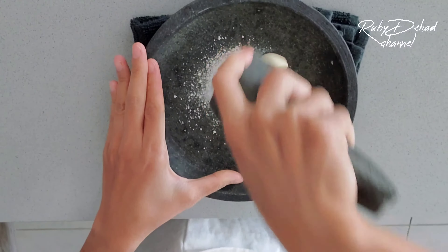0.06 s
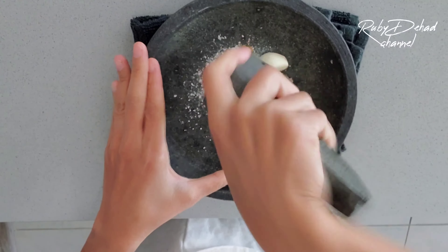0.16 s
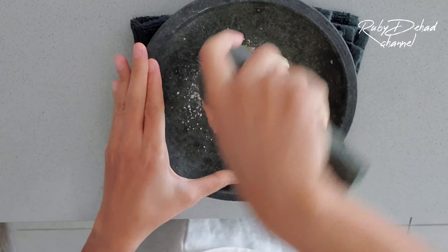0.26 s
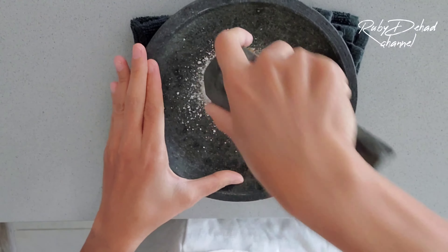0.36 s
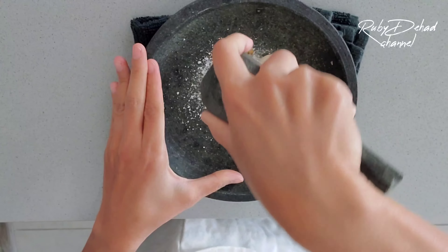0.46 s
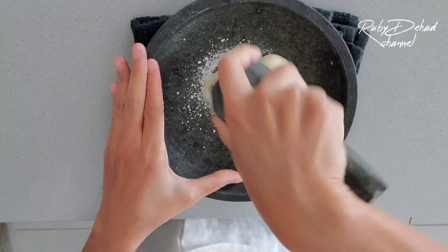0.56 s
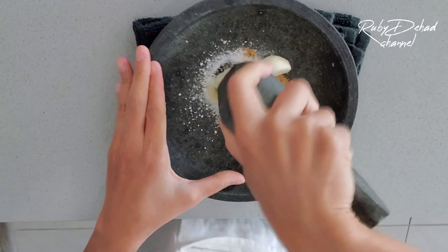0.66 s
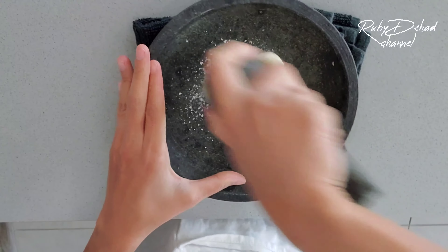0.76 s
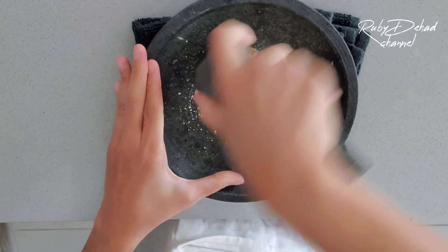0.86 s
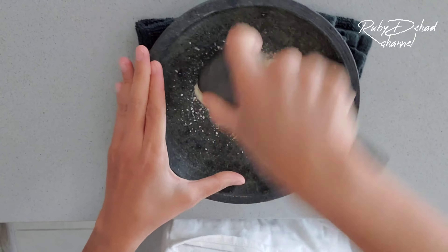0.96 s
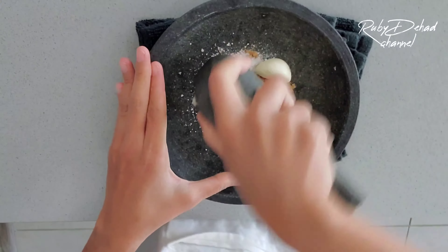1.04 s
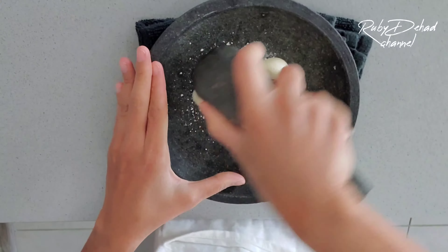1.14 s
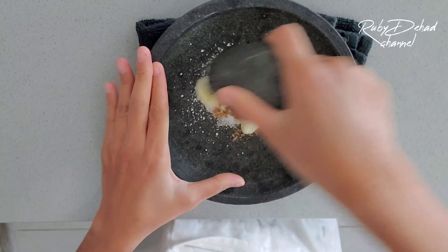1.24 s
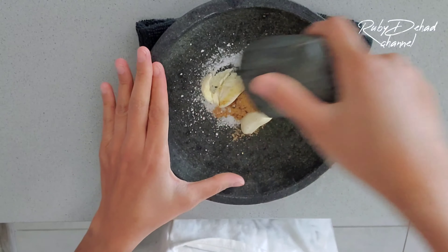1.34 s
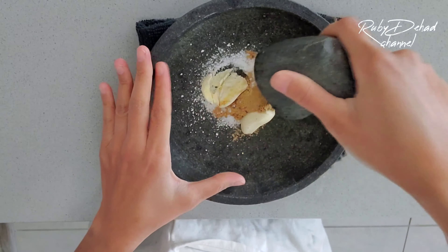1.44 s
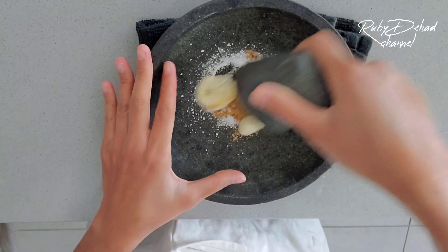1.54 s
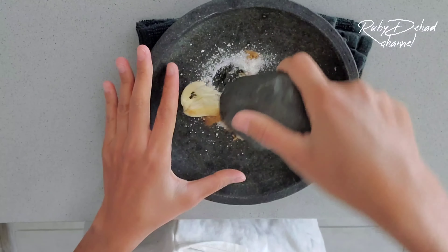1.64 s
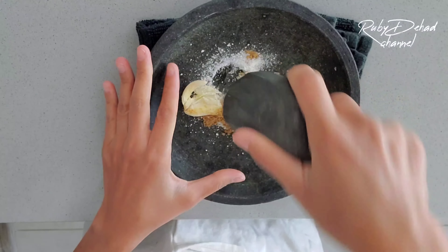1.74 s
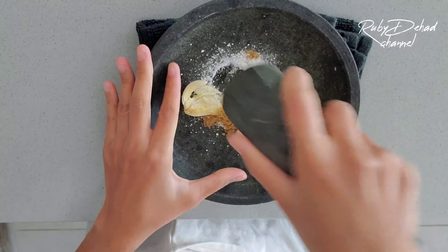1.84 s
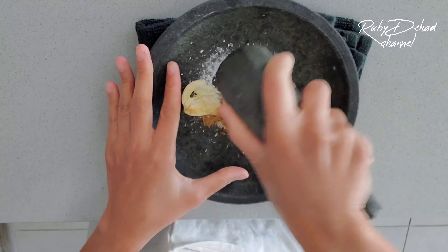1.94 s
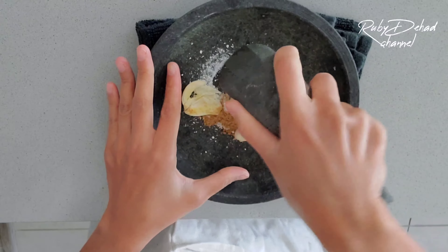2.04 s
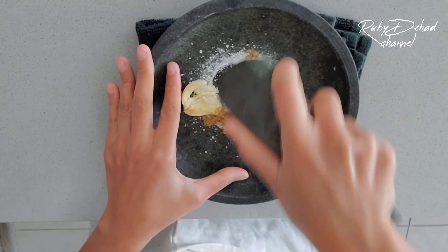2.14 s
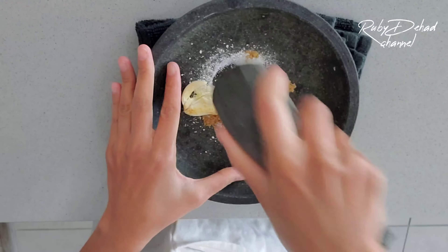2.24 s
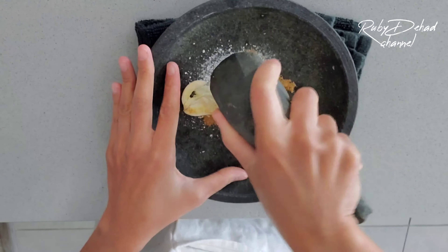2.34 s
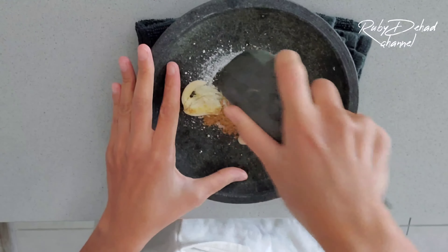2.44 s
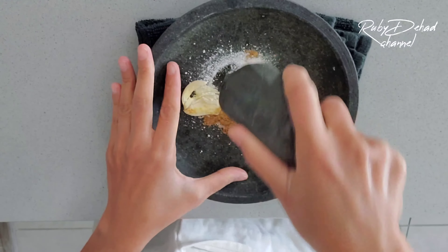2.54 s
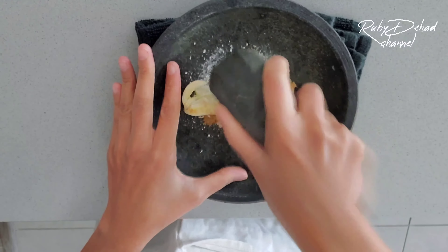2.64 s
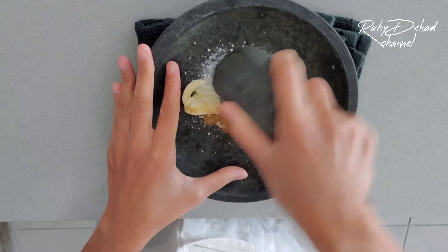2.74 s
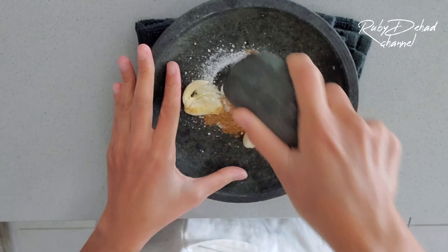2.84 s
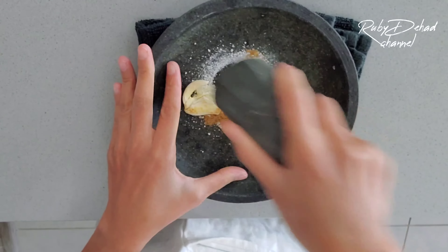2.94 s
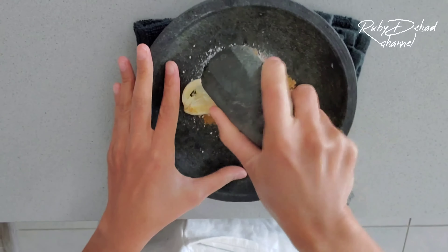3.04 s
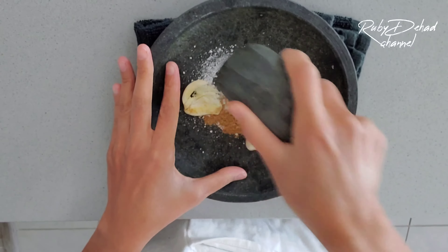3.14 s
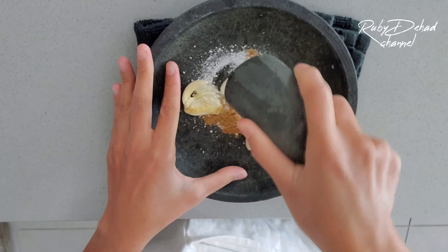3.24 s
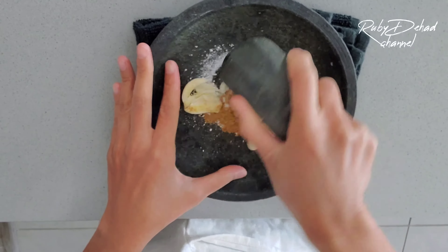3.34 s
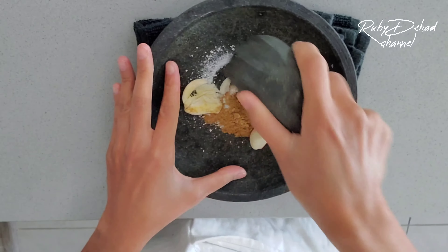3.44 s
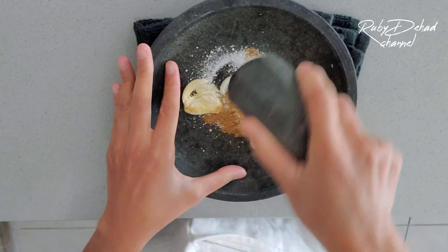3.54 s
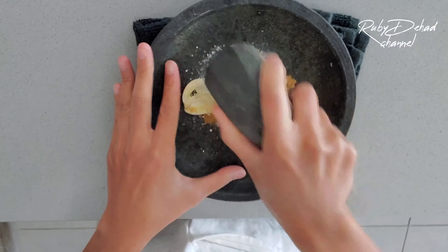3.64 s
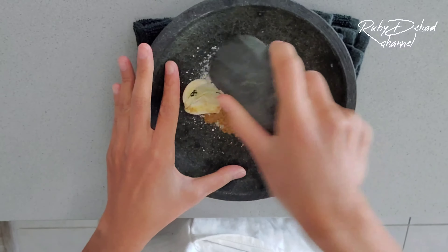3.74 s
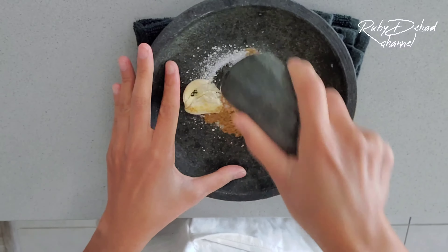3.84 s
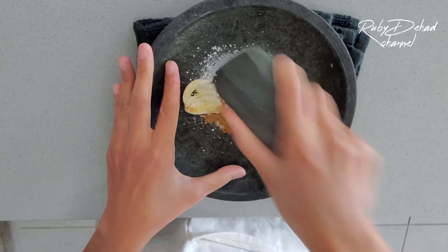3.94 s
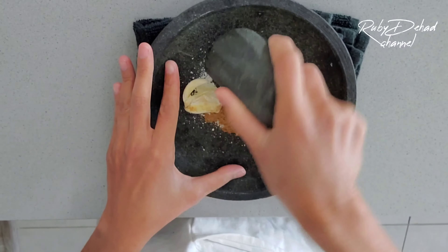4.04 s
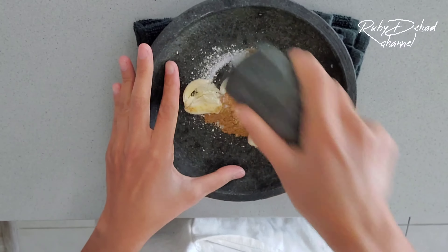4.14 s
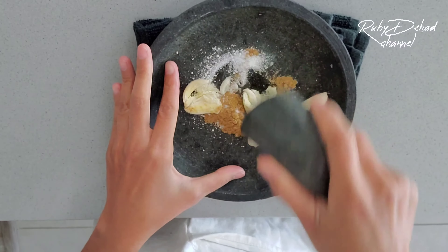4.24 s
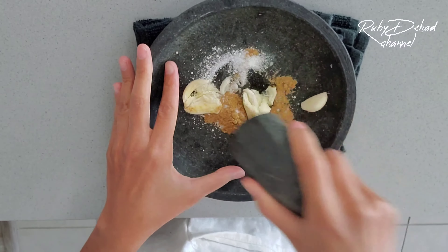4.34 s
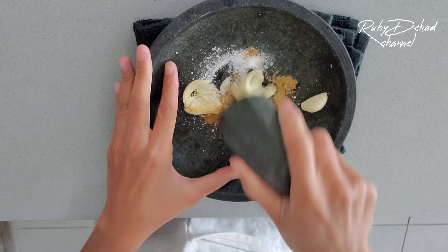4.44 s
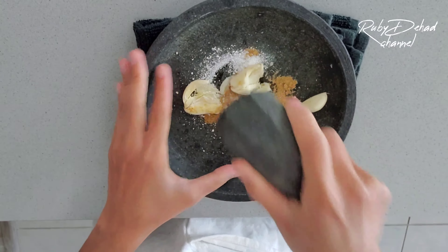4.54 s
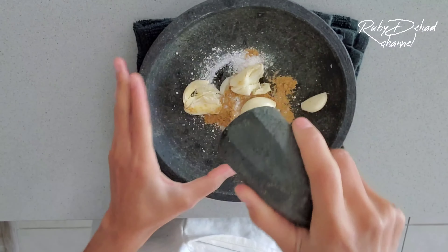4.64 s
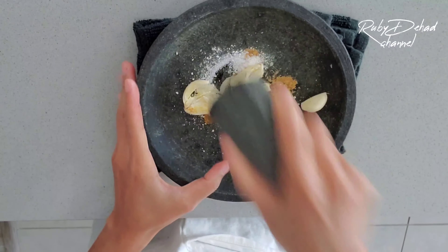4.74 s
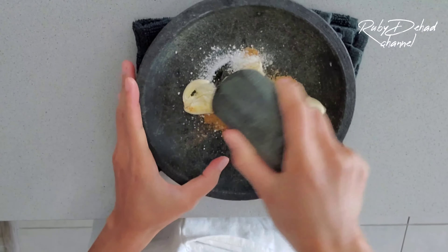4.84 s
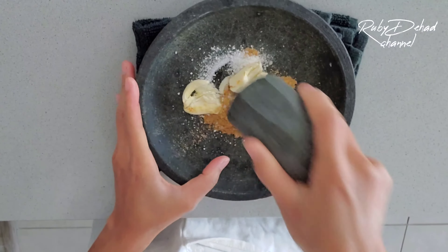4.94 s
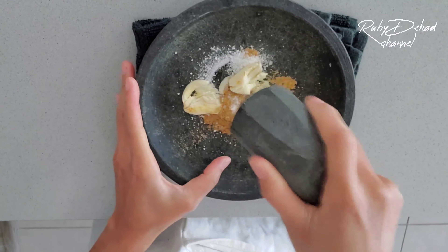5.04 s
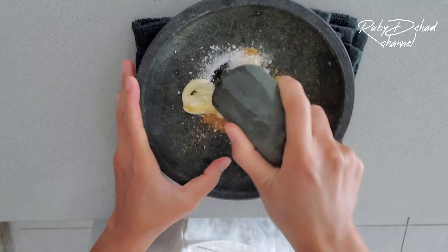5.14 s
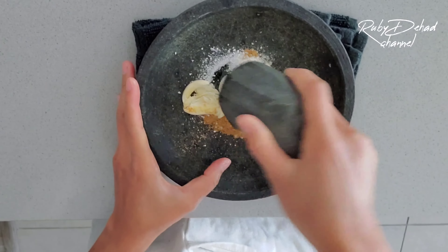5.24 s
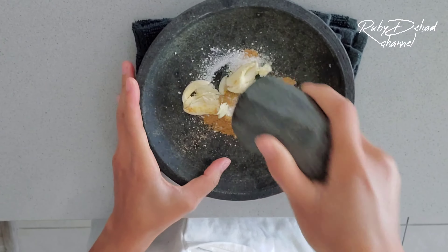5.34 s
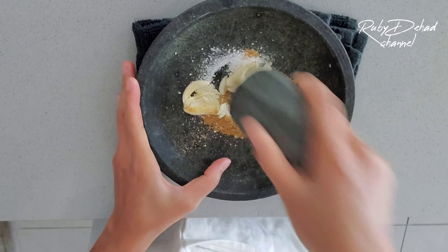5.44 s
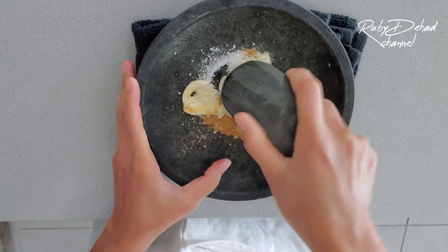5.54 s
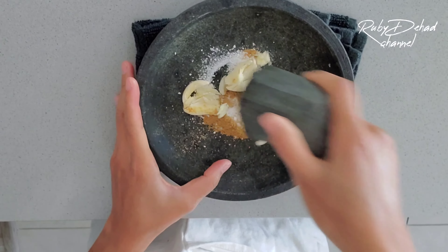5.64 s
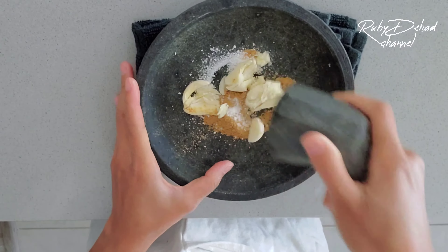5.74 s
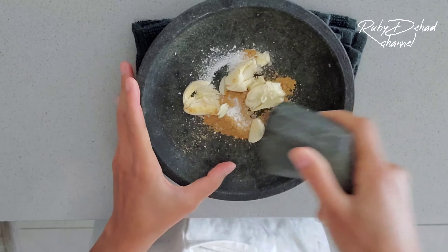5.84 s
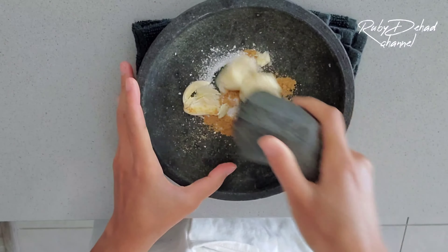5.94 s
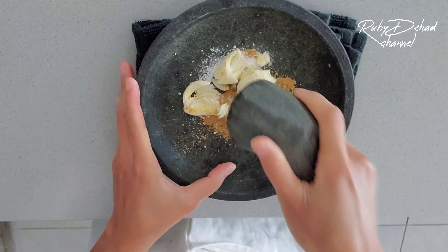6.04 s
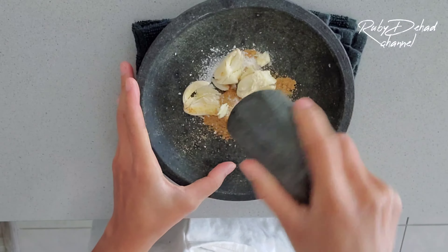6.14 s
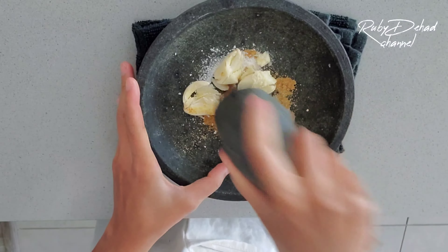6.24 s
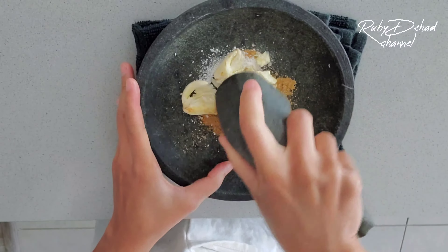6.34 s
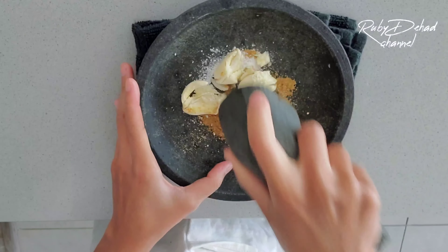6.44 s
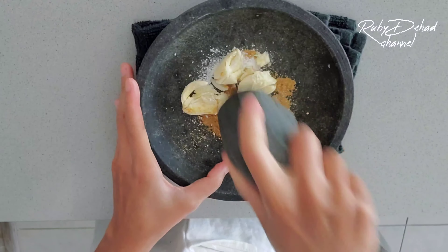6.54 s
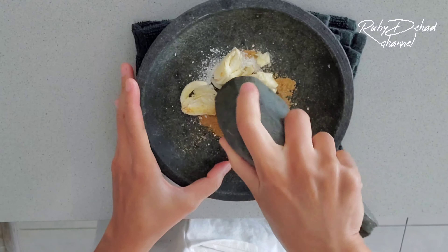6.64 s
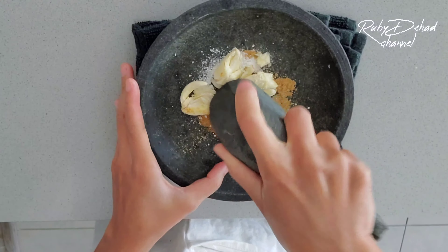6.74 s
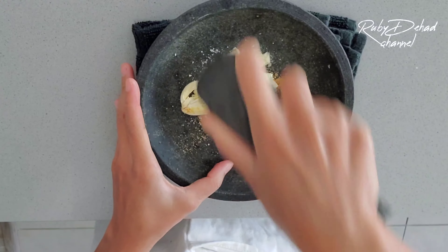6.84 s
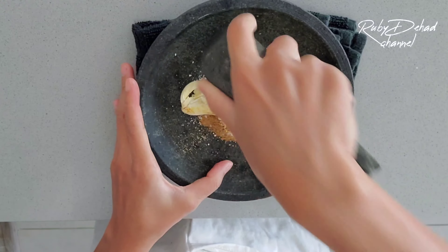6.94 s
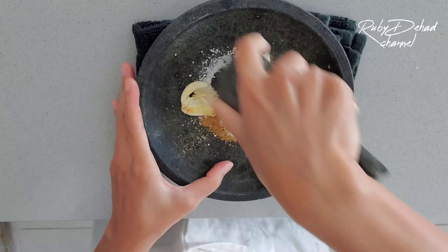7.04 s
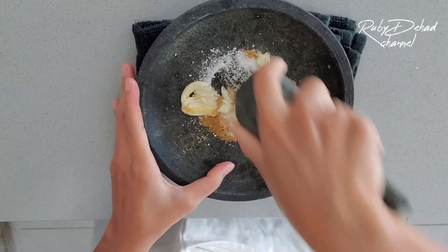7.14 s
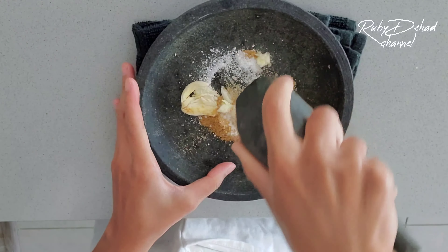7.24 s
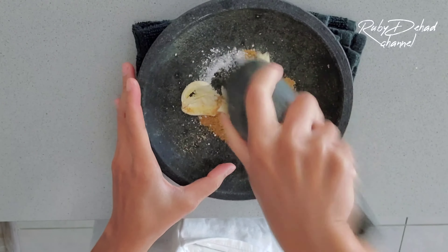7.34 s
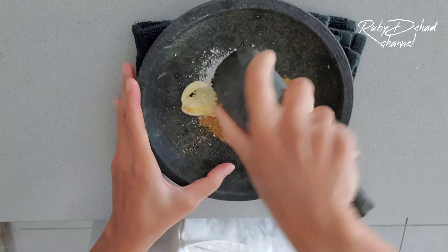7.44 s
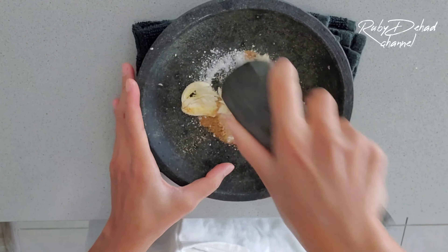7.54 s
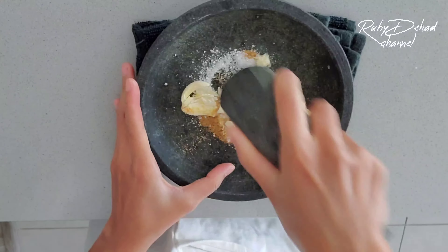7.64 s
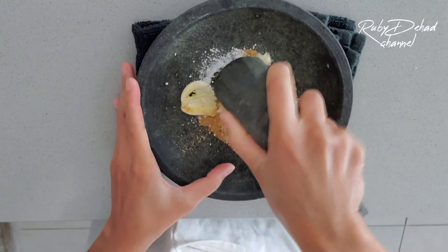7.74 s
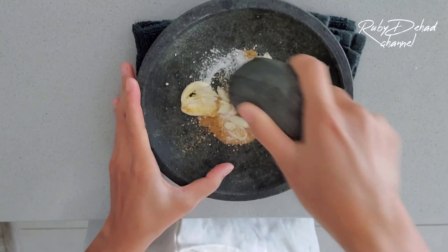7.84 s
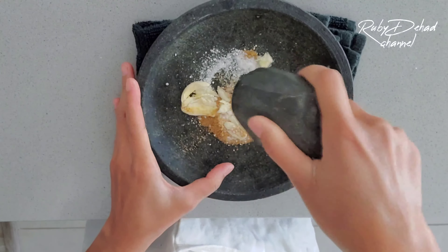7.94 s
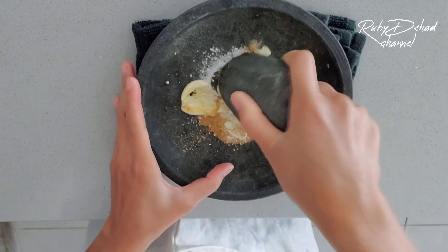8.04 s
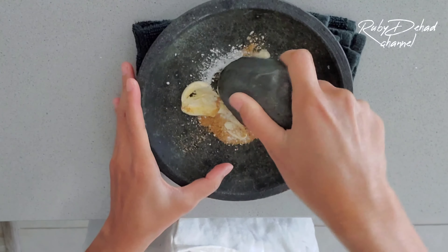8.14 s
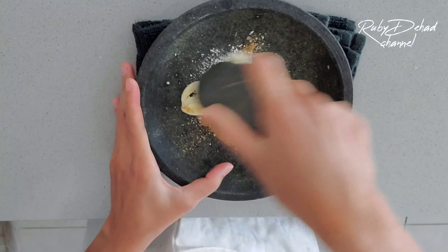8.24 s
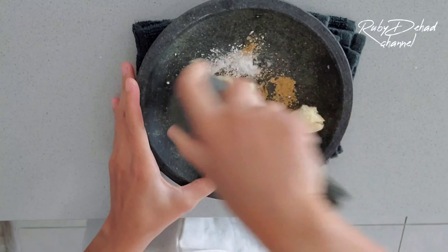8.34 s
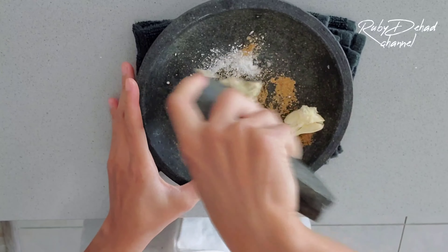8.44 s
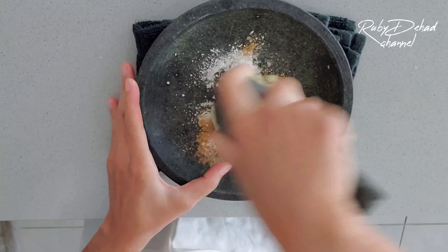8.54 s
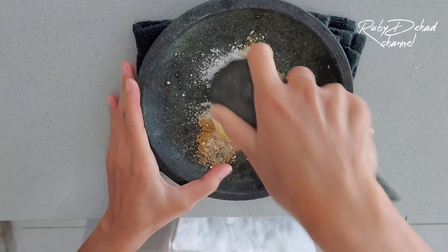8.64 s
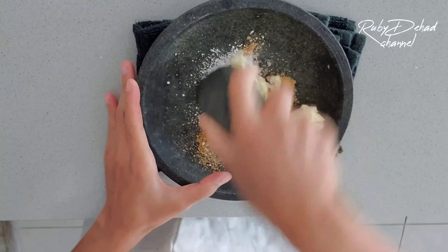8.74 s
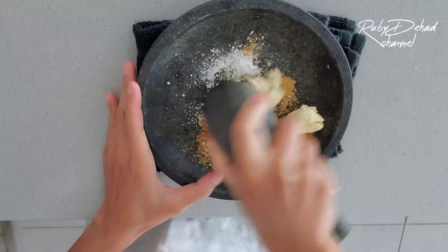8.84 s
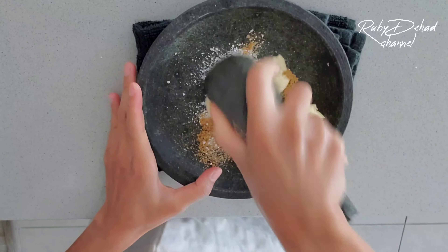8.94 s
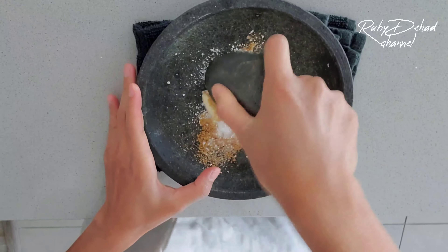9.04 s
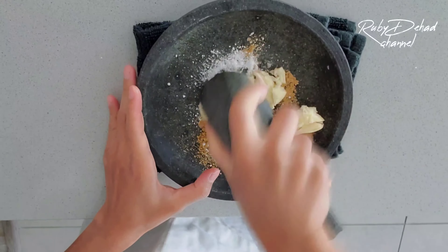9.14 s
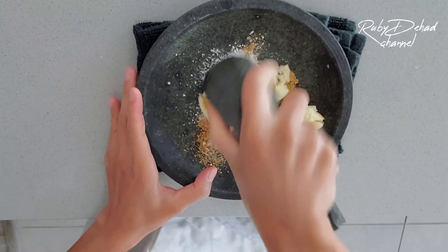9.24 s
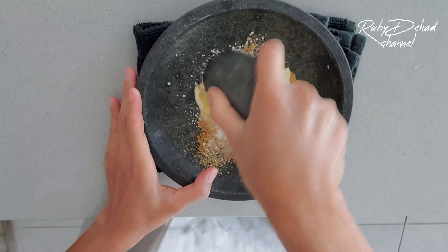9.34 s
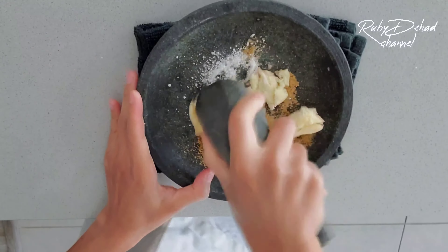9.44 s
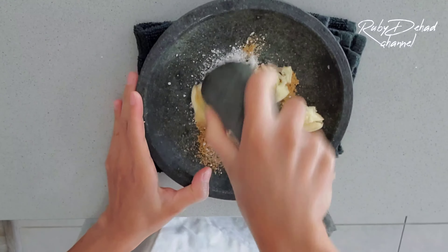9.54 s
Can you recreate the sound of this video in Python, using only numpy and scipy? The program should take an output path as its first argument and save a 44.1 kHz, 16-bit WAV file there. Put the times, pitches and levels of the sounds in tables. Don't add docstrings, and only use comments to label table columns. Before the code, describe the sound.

A stone mortar and pestle is heard from close above on a kitchen counter. At 0.1 seconds a crunchy blow lands with a low thump, then a softer one at 0.55. Until about 1.6 seconds, light gritty drags, clacks, a small squeak and snapping salt crystals fill in. From 1.9 to 3.9 seconds, firm blows fall roughly every third of a second, some doubled by a quick rebound: a bright sandy crack, short dry pestle ring, hollow bowl knock and deep, soft counter thump. A small scrape at 4.3 precedes more blows at 4.7 to 5.4, a pause with a faint squeak near 5.9, then pounding from 6.2 to 8.0, with one weak touch near 6.9. From 8.3 to 9.6 quieter grinding strokes crunch and rub, with clacks, ticks and squeaks. Short tile echoes, faint fridge hum and hiss remain underneath.

```python
import sys
import numpy as np
from scipy import signal
from scipy.fft import rfft, irfft, next_fast_len
from scipy.io import wavfile
from scipy.ndimage import uniform_filter1d

SR = 44100
rng = np.random.default_rng(int(sys.argv[2]) if len(sys.argv) > 2 else 0)


def master_out(mix):
    frames = np.transpose(np.atleast_2d(mix))
    ceiling = np.clip(frames, -1, 1)
    pcm = np.round(ceiling * 32767).astype(np.int16)
    wavfile.write(sys.argv[1], SR, pcm)


def ratio_of_db(decibels):
    return 10 ** (np.asarray(decibels, float) / 20)


N = 422478

# (time [s], crack peak [dB], counter thump [dB], pestle ring [dB], dull clunk [dB])
BLOWS = [(0.1267, -22.5, -27.5, -29, -35), (0.5497, -36, -38.5, -40.5, -72),
         (1.8834, -25.5, -26.5, -33, -35.5), (2.2448, -6.5, -21.5, -17, -29.5),
         (2.6166, -13.5, -20.5, -21.5, -45), (2.9578, 2, -21.5, -25.5, -27.5),
         (3.2785, -15, -24.5, -30, -39), (3.2909, -8, -28, -25.5, -45), (3.6024, -11.5, -23, -68.5, -58),
         (3.6131, -8, -23.5, -27, -31.5), (3.9031, -16, -26, -28.5, -58), (4.7121, -19.5, -24, -32, -30.5),
         (5.0681, -11, -22, -36.5, -27), (5.4189, -10.5, -24.5, -19, -26.5),
         (6.2273, -13, -30.5, -20.5, -37.5), (6.5327, -15, -31.5, -22.5, -43),
         (6.9314, -29, -48.5, -61.5, -83.5), (7.2938, -13.5, -30, -26, -41), (7.6408, -15, -24, -35, -42.5),
         (7.9937, -15, -26, -5.5, -9.5)]
# (time [s], crack peak [dB], dull clunk [dB])
TOUCHES = [
    (2.6125, -28.5, -45.5),
    (5.0645, -24.5, -27.5),
    (5.0703, -11.5, -26),
    (6.2215, -34, -37.5),
    (6.2285, -24.5, -42.5),
    (0.7665, -24.5, -27.5),
    (4.7145, -15, -34.5),
    (9.5055, -34, -37),
]
# (time [s], crush peak [dB], build-up [s], crushing time [s])
CRUSHES = [(0.1275, -8.5, 0.0021, 0.013), (0.547, -15, 0.0012, 0.0095), (1.884, -10.5, 0.0022, 0.0095),
           (2.2418, -15.5, 0.0028, 0.025), (2.616, -15, 0.004, 0.02), (2.965, -12.5, 0.0088, 0.011),
           (3.276, -6, 0.0011, 0.015), (3.286, -17.5, 0.006, 0.0048), (3.6022, -5, 0.0023, 0.003),
           (3.615, -20, 0.0015, 0.029), (3.904, -1, 0.0026, 0.011), (4.706, -21.5, 0.0032, 0.038),
           (4.71, -12.5, 0.0054, 0.0058), (5.0402, -29, 0.0016, 0.018), (5.066, -8, 0.004, 0.021),
           (5.3918, -34.5, 0.003, 0.019), (5.417, -9, 0.003, 0.017), (6.2015, -35.5, 0.0024, 0.018),
           (6.221, -17.5, 0.0035, 0.041), (6.5364, -6.5, 0.0052, 0.0062), (6.9306, -32.5, 0.0032, 0.018),
           (7.295, -1.5, 0.0033, 0.014), (7.6212, -34, 0.0026, 0.043), (7.6376, -11, 0.0045, 0.015),
           (7.99, -8.5, 0.0023, 0.02)]
# (time [s], crack peak [dB])
TICKS = [(0.597, -28.5), (0.642, -46), (0.714, -38), (0.981, -38), (0.985, -38), (1.016, -27), (1.033, -32),
         (1.048, -38), (1.06, -39), (1.077, -43), (1.0936, -34), (1.104, -42.5), (1.1523, -38),
         (1.438, -34), (1.451, -41), (1.476, -33), (1.5, -27.5), (1.563, -31.5), (3.9495, -23.5),
         (4.313, -38), (4.335, -24), (4.388, -30.5), (5.528, -44.5), (6.9512, -54.5), (6.97, -37),
         (6.999, -45), (7.38, -35.5), (8.707, -31), (8.8556, -33), (8.909, -33), (8.9464, -40.5),
         (9.071, -26), (9.119, -35), (9.177, -37), (9.192, -25.5), (9.2406, -25), (9.2555, -33),
         (9.369, -27.5), (9.381, -28), (9.519, -31), (9.5496, -23)]
# (time [s], crack peak [dB], pestle ring [dB], bowl knock [dB])
CLACKS = [(0.136, -17, -29, -45), (0.762, -31, -23, -38), (0.85, -47, -42, -50), (0.938, -33, -32, -46),
          (5.879, -41.5, -54, -63), (7.9931, -33, -45, -21), (8.403, -33, -51, -92),
          (8.6941, -36.5, -41.5, -85), (8.753, -21.5, -34, -78), (8.968, -36, -35.5, -69),
          (9.0319, -31, -27, -46), (9.0442, -24, -26, -44), (9.2818, -50, -35.5, -53.5),
          (9.3058, -43, -27.5, -47.5), (9.3508, -23.5, -32, -69), (9.4586, -65, -24.5, -43.5),
          (9.468, -51, -38, -38), (9.5053, -15, -60, -42)]
LOOSE_DB = [-28.5, -40, -26, -26, -29.5, -31, -28, -29, -31.5, -29, -23, -25, -27, -28.5, -38, -24, -45,
            -31, -23, -29.5]
# (time [s], peak [dB], pitch [Hz])
KNOCKS = [(0.716, -41.5, 760), (0.7639, -29, 495), (.778, -37, 520), (0.852, -46, 480), (.944, -38.5, 346),
          (8.851, -57, 329), (8.988, -44, 358), (9.014, -36.5, 320), (9.022, -37.5, 348),
          (9.0445, -34, 308), (9.178, -51, 410), (9.308, -45, 365), (9.407, -46, 378), (9.4574, -36.5, 400),
          (9.47, -39, 415), (2.6157, -31.5, 375), (5.128, -49, 625)]

# (peak time [s], rise [ms], fall [ms], crunch [dB], coarse grit against crunch [dB])
DRAGS = [(0.001, 9, 73.5, -69, -12), (0.15, 8, 41, -56.5, 0.5), (0.234, 94.5, 50, -43.5, -7),
         (0.599, 32, 25, -49, -35), (0.65, 94.5, 65, -55, -10), (0.734, 53, 82.5, -36.5, -13.5),
         (0.77, 44.5, 31, -37.5, 2.5), (0.861, 64, 102, -52.5, 2), (0.938, 10.5, 35.5, -54, -22.5),
         (0.99, 30, 76.5, -45.5, -5), (1.057, 102, 64, -41, -12), (1.153, 14, 71.5, -57.5, -15),
         (1.445, 23, 95.5, -46.5, -34), (1.529, 70, 57, -38.5, -11.5), (2.019, 8, 18, -67, -12),
         (2.375, 6.5, 16, -59, -12), (2.737, 21, 22.5, -48.5, -20.5), (2.979, 12.5, 117, -52, -11),
         (3.93, 13, 49, -44, -27), (3.954, 45, 46.5, -54, -14), (4.344, 38, 84, -40, -8.5),
         (5.879, 8.5, 28.5, -40.5, -4), (6.93, 13.5, 71.5, -33.5, -29), (6.996, 56, 47, -41, -20.5),
         (7.375, 55.5, 47, -46.5, -7.5), (7.765, 27.5, 29, -54.5, -31.5)]
# (peak time [s], rise [ms], fall [ms], crunch [dB], coarse grit against crunch [dB])
GRINDS = [(8.348, 25.5, 15.5, -53, -6.5), (8.401, 20, 60, -45.5, -16), (8.435, 51, 58, -40.5, -1),
          (8.705, 24.5, 119, -56, -8), (8.82, 134, 106, -50.5, -9.5), (8.907, 121, 67, -43.5, -11.5),
          (8.98, 100, 120, -47, -6.5), (9.117, 134, 50, -47.5, -14.5), (9.186, 54, 106, -43, -10.5),
          (9.249, 85, 60, -41.5, -11), (9.383, 70, 43, -34.5, -10.5), (9.47, 43, 106, -42.5, -9),
          (9.544, 103, 44, -40.5, -22)]
# (peak time [s], rise [ms], fall [ms], pestle ring [dB], bowl rumble [dB])
RUBS = [(.236, 35.5, 26, -41, -46), (.76, 64, 81, -45, -42), (.86, 37, 51, -60, -51.5),
        (.94, 3, 37, -55, -53), (1.53, 94, 48, -62, -71.5), (5.885, 16, 41, -51.5, -59),
        (7.0, 62, 45, -46.5, -91), (7.65, 36.5, 62, -76, -52.5), (8.345, 21, 24, -57.5, -77),
        (8.432, 50, 55, -45.5, -95), (8.744, 63, 94, -59, -83), (8.85, 62, 50, -51, -72.5),
        (9.02, 42, 44, -42, -41.5), (9.12, 38, 27, -45.5, -68), (9.18, 50, 35, -43.5, -57),
        (9.315, 15, 4, -35, -44), (9.4, 41, 50, -41.5, -53.5), (9.47, 27, 35, -34.5, -48),
        (9.575, 12, 33.5, -56.5, -74)]
# (peak time [s], rise [ms], fall [ms], level [dB])
SQUEAKS = [(.775, 10, 64, -46.5), (.87, 40, 52, -54), (.941, 7, 9.5, -38.5), (5.66, 9, 59, -70),
           (5.71, 8.5, 31.5, -71.5), (5.89, 18.5, 17, -45), (8.87, 30, 40.5, -57), (9.0, 10, 41.5, -53),
           (9.04, 17, 27.5, -43), (9.285, 12, 22, -50), (9.312, 2.5, 26, -54), (9.38, 30, 40, -52),
           (9.465, 9, 40, -68), (9.52, 24, 39.5, -59.5)]
# (peak time [s], rise [ms], fall [ms], level [dB])
SWAYS = [(0.001, 13, 57, -57.5), (.66, 52, 99, -61.5), (.95, 82, 242, -60), (1.45, 33, 189, -59),
         (4.345, 25.5, 60, -51.5), (5.89, 31.5, 56.5, -57), (8.37, 32, 49.5, -56.5), (8.72, 31, 33, -54.5),
         (8.91, 99, 42, -55.5), (9.08, 64, 91, -51), (9.3, 85, 156, -59), (9.47, 107, 53, -48)]

# (start [s], big grains [dB], fine powder [dB])
GRAIN = [(0, 4, 4), (.2, 0.5, -2.5), (.53, -5, 3.5), (.68, 3, -4), (.8, 3, -3.5), (.92, 2, 7),
         (.97, -5, -8), (1.13, 3.5, -4), (1.4, 0, 7.5), (1.5, -0.5, -3.5), (1.85, 1, 4.5), (2.2, 0, 6.5),
         (2.58, 6, 0), (2.7, 6, -3), (2.92, 0.5, 0.5), (3.25, 1, 2), (3.57, 0, 3), (3.87, -1.5, 3.5),
         (4.3, -4.5, -1), (4.67, -2.5, 2.5), (5.02, 1.5, 3.5), (5.37, 1, 1.5), (5.6, -5.5, 13),
         (6.18, -1.5, 0), (6.5, 5, 7), (6.88, -1.5, -2), (6.97, 4.5, -8), (7.26, 0.5, 1), (7.34, 2, -3),
         (7.6, -2, -0.5), (7.96, 0, -1.5), (8.32, 1.5, -1), (8.66, 3, -5), (8.8, 3.5, 0.5), (8.94, 3, -5),
         (9.06, 3.5, -1), (9.16, 1.5, -6.5), (9.23, -0.5, -2.5), (9.33, 1.5, -0.5), (9.44, -3.5, -6.5),
         (9.52, -8, -7.5)]
# (start [s], centre [Hz], boost [dB])
BAND_LIFTS = [(0.12, 5660, 2.5), (0.69, 1090, 15), (0.75, 7940, 4), (0.8, 1100, 10), (0.97, 1260, 4),
              (1.03, 1880, 5), (1.42, 4800, 8), (1.49, 3940, 11.5), (1.87, 1090, 5), (2.23, 1400, -0.5),
              (2.6, 2140, -0.5), (2.71, 2310, 16), (2.94, 3300, 2.5), (3.27, 4600, 9), (3.285, 6100, 3),
              (3.59, 1450, 12), (3.608, 1905, 12.5), (3.89, 3130, 6.5), (4.69, 2025, 3.5), (5.05, 1730, 5),
              (5.4, 2214, 5.5), (5.86, 1098, 13), (6.21, 1522, 8), (6.52, 7970, 5.5), (6.91, 1934, 14.5),
              (6.97, 3550, 7), (7.28, 3820, 6), (7.34, 4550, 3), (8.68, 1273, 4), (8.87, 2080, 1),
              (8.94, 1810, 2), (9.06, 1880, 10), (9.15, 1110, 6), (9.33, 1610, 4.5), (9.4, 1590, 13)]
# (start [s], centre [Hz], change [dB])
BAND_DIPS = [(0.8, 1900, -12), (1.03, 1100, -11), (2.599, 4480, -19), (3.27, 2140, -10), (3.285, 1100, -13),
             (3.608, 1095, -13), (6.52, 4340, -9), (6.91, 1100, -13.5), (7.28, 8030, -22), (7.34, 1100, -11),
             (8.68, 8000, -5), (8.87, 1100, -14), (9.06, 2940, 2.5), (9.4, 6990, -4)]

# (frequency [Hz], density [dB per Hz])
SALT = [(1290, -40), (2200, -18), (2910, -0.5), (4470, -1.5), (5110, 1), (7920, -2.5), (9380, -20.5),
        (12200, -8), (15200, -7), (16100, -18.5), (16500, -38)]
# (frequency [Hz], density [dB per Hz])
COARSE = [(500, -27), (950, -28.5), (1200, -0.5), (2000, 5), (2800, -7.5), (5000, -34)]
# (frequency [Hz], density [dB per Hz])
CRACK = [(1290, -28.5), (2200, -11), (3430, -3), (6940, -17), (8020, -12.5), (9430, -27.5), (11000, -22),
         (12800, -16), (14700, -20), (16800, -37.5)]
# (frequency [Hz], density [dB per Hz])
CLUNK = [(600, -18), (900, -11), (1300, -2.5), (1750, -3.5), (2400, -25.5), (5000, -34)]
# (frequency [Hz], density [dB per Hz])
RATTLE = [(70, -20), (130, -9), (200, 8.5), (300, 2.5), (480, -10.5), (900, -36)]
# (frequency [Hz], level [dB], time to fade 60 dB [s])
PESTLE = [(2923, 1.5, 0.032), (2980, -1, 0.012), (2880, -9.5, 0.024), (2925, -30.5, 0.52)]
# (frequency [Hz], level [dB], time to fade 60 dB [s])
OVERTONES = [(5310, -1, .024), (5750, -9, .02), (7940, -5, .03)]
# (frequency [Hz], level [dB], time to fade 60 dB [s])
BOWL = [(307, 8, 0.017), (397, -3, 0.05), (520, -7.5, 0.014), (274, -19, 0.14)]
# (frequency [Hz], level [dB], time to fade 60 dB [s])
RIM = [(830, -4, 0.012), (1053.5, -1.5, 0.031), (1204, -3, 0.038), (1336, -6.5, 0.044), (1700, -9.5, 0.25)]
# (frequency [Hz], level [dB], time to fade 60 dB [s])
TOWEL = [(80.6, -6.5, 0.082), (44.4, -17.5, 0.71), (114.4, -10.5, 0.16)]
# (frequency [Hz], level [dB], time to fade 60 dB [s])
COUNTER = [(75.2, 2, 0.23), (36.44, -12.5, 0.032), (99.64, -13, 0.53), (170, -18, 0.97), (134.4, -9, 0.19)]

# (frequency [Hz], side against mid [dB])
PORTS = [(60, -24), (110, -15), (200, -15), (380, -16), (700, -12), (1290, -11), (2380, -12), (3300, -11),
         (4600, -1.5), (8120, 0), (15000, 0.5)]
# (frequency [Hz], phase of side against mid [rad])
TURN = [(1000, 1.53), (8000, 1.4), (13000, 1.05)]
# (frequency [Hz], echo level [dB])
KITCHEN = [(100, -13.5), (400, 4.5), (1500, -2), (4000, 1.5), (8000, 2), (16000, -8.5)]
# (frequency [Hz], rms level [dB])
HUM = [(59.2, -71), (118.4, -68), (532.9, -85.5)]
# (frequency [Hz], density [dB per Hz])
AIR = [(15, -34), (25, -1.5), (124, -6.5), (146, -16.5), (172, -24.5), (259, -26), (445, -35), (524, -16.5),
       (809, -33.5), (2330, -40), (2900, -33.5), (7710, -34), (9330, -51.5), (14800, -36), (16500, -49.5)]

AIR_DB = -70
KNOCK_UNDER_THUMP_DB = -18
TICK_RING_DB, TICK_KNOCK_DB, TICK_OVERTONE_DB, TICK_PUFF_DB = -43.5, -43, -19, -24
CLACK_OVERTONE_DB, CLACK_PUFF_DB = -15, -19
SQUEAL_UNDER_CRUNCH_DB, SQUEAL_UNDER_RING_DB = -25, -22.5
SWELL_CURVE = 1.44
RUB_DAMPING = 0.59
BIG_UNDER_HZ, FINE_OVER_HZ = 4148, 8750
BAND_WIDTH, STROKE_S = 0.14, 0.12
KNOCK_CYCLES = 8.2


def mortar():
    salt, crack, clunk, pestle, bowl, rim, counter, rattle, glance = hit_forces()
    crunch, coarse, scrape, rumble, squeal = drag_forces()
    snaps, bumps = crystals(), grains(830, 3.2)

    grit = colour((salt + ratio_of_db(-1.5) * crunch) * snaps, SALT) + colour(clunk, CLUNK)
    grit += colour((ratio_of_db(-5.0) * coarse + ratio_of_db(-8.0) * salt) * snaps, COARSE)
    grit = grain_size(grit + ratio_of_db(-5.0) * colour(crack, CRACK))
    grit = tint_bands(tint_bands(grit, BAND_LIFTS), BAND_DIPS)

    pressed = [(hz, db, RUB_DAMPING * t60) for hz, db, t60 in PESTLE]
    stone = ring(ratio_of_db(1.0) * pestle, PESTLE) + ring(ratio_of_db(-16.0) * scrape * bumps, pressed)
    stone = cut(stone, 2600, "high")
    slide = ratio_of_db(-21.5) * squeal * grains(990, 2.6)
    squeak = ring(glance + ratio_of_db(-20.5) * pestle + slide, OVERTONES)

    hollow = ring(ratio_of_db(2.0) * bowl + ratio_of_db(-26.0) * rumble * bumps, BOWL, patchy_db=4.0)
    hollow = cut(hollow, 170, "high")
    edge = ring(rim, RIM) + ring(ratio_of_db(-8.0) * bowl + ratio_of_db(-29.5) * rumble * bumps, RIM[:-1])
    return grit + stone + squeak + hollow + edge + knocks(), counter_thump(counter, rattle)


def hit_forces():
    salt, crack, clunk, pestle, bowl, rim, counter, rattle, glance = np.zeros((9, N))
    t = np.arange(int(.3 * SR)) / SR
    short = t[:256]
    snap = rng.standard_normal((len(BLOWS) + len(TICKS) + len(CLACKS), 2, 256))
    snap *= np.exp(-short / .0006) * (1 - np.exp(-short / .0002))
    snap = 3.15 * irfft(np.exp(1j * np.angle(rfft(snap)))) * np.exp(-(short / .003) ** 2)
    tap = np.hanning(9)[1:-1] / 4
    push = np.sin(np.pi * np.clip(t / 0.0073, 0, 1)) ** 2
    shake = np.minimum(t / 0.0059, 1) * np.exp(-t / 0.069)
    puff = np.minimum(t / 0.00033, 1) * np.exp(-t / 0.0059)

    for k, (s, db, thump_db, ring_db, clunk_db) in enumerate(BLOWS):
        add(crack, s, ratio_of_db(db) * snap[k, 0])
        add(clunk, s, ratio_of_db(clunk_db + 6.5) * snap[k, 1])
        add(pestle, s + .0005, ratio_of_db(ring_db) * tap)
        add(bowl, s + 0.0014, ratio_of_db(thump_db + KNOCK_UNDER_THUMP_DB) * tap)
        add(rim, s + 0.0006, ratio_of_db(clunk_db - 15.5) * tap)
        if k and s - BLOWS[k - 1][0] < .02:
            continue
        add(counter, s - .003, ratio_of_db(thump_db) * push / push.sum())
        add(rattle, s, ratio_of_db(thump_db + LOOSE_DB[k]) * shake)

    for k, (s, db, clunk_db) in enumerate(TOUCHES):
        add(crack, s, ratio_of_db(db) * snap[-1 - 2 * k, 1])
        add(clunk, s, ratio_of_db(clunk_db + 3.5) * snap[-2 - 2 * k, 1])

    after = t - .03
    for s, db, rise_s, crush_s in CRUSHES:
        fade = np.where(after < 0, after / max(rise_s, .0005), -after / max(crush_s, .002))
        add(salt, s - .03, ratio_of_db(db - 27.0) * np.exp(fade))

    for k, (s, db, ring_db, knock_db, over_db, puff_db) in enumerate(light_contacts()):
        add(glance, s, ratio_of_db(over_db + 8.0) * tap)
        add(crack, s + .001, ratio_of_db(db + 4) * snap[len(BLOWS) + k, 0] * np.exp(-short / .0005))
        add(pestle, s, ratio_of_db(ring_db - 2.0) * tap)
        add(bowl, s, ratio_of_db(knock_db + 1.5) * tap)
        add(salt, s - .002, ratio_of_db(puff_db) * puff)
    return salt, crack, clunk, pestle, bowl, rim, counter, rattle, glance


def light_contacts():
    ticks = [(s, db, db + TICK_RING_DB, db + TICK_KNOCK_DB, db + TICK_OVERTONE_DB, db + TICK_PUFF_DB)
             for s, db in TICKS]
    clacks = [(s, db, ring_db, knock_db, ring_db + CLACK_OVERTONE_DB, db + CLACK_PUFF_DB)
              for s, db, ring_db, knock_db in CLACKS]
    return sorted(ticks + clacks)


def drag_forces():
    crunch, coarse = strokes([(s, rise, fall, db, db + rel) for s, rise, fall, db, rel in DRAGS + GRINDS])
    scrape, rumble = strokes(RUBS)
    squeal = ratio_of_db(SQUEAL_UNDER_CRUNCH_DB) * crunch + ratio_of_db(SQUEAL_UNDER_RING_DB) * scrape
    squeal = squeal + strokes(SQUEAKS)[0]
    press = ratio_of_db(2.2 * walk(86))
    slips = ratio_of_db(4 * walk(60))
    return press * crunch, press * coarse, slips * scrape, slips * rumble, slips * squeal


def strokes(rows):
    out = np.zeros((len(rows[0]) - 3, N))
    ms = np.arange(N) / SR * 1000
    for s, rise_ms, fall_ms, *dbs in rows:
        i, j = max(int((s - .003 * rise_ms) * SR), 0), int((s + .003 * fall_ms) * SR)
        late = ms[i:j] - s * 1000
        away = np.where(late < 0, -late / rise_ms, late / fall_ms)
        swell = ratio_of_db(dbs)[:, None] * ratio_of_db(-20 * away ** SWELL_CURVE)
        out[:, i:j] = np.maximum(out[:, i:j], swell)
    return out


def crystals(edges_hz=(600, 2500, 4200, 6500, 9500, 17000), patchy_db=3.5):
    out = 0
    for lo, hi in zip(edges_hz[:-1], edges_hz[1:]):
        snaps = 0.63 * grains(1500, 2.6) + 0.21 * rng.standard_normal(N)
        out = out + ratio_of_db(patchy_db * walk(30)) * cut(snaps, [lo, hi], "band")
    return out


def grains(per_s, scatter_db):
    size = ratio_of_db(scatter_db * np.minimum(rng.exponential(size=N), 2.5))
    x = (rng.random(N) < per_s / SR) * np.clip(rng.standard_normal(N), -2, 2) * size
    return x / np.sqrt(np.mean(x ** 2))


def grain_size(x):
    rows = np.array(GRAIN)
    now = np.searchsorted(rows[:, 0], np.arange(N) / SR, side="right") - 1
    big, fine = (uniform_filter1d(ratio_of_db(rows[:, k])[now], size=400) - 1 for k in (1, 2))
    low = signal.sosfiltfilt(signal.butter(2, BIG_UNDER_HZ, "low", fs=SR, output="sos"), x)
    high = signal.sosfiltfilt(signal.butter(2, FINE_OVER_HZ, "high", fs=SR, output="sos"), x)
    return x + big * low + fine * high


def tint_bands(x, table):
    out = x.copy()
    ends = [row[0] for row in table[1:]] + [N / SR]
    for (s, hz, db), until in zip(table, ends):
        i, j = int(s * SR), min(int(min(until, s + STROKE_S) * SR), N)
        b, a = signal.iirpeak(hz, 1 / BAND_WIDTH, fs=SR)
        band = signal.filtfilt(b, a, x[i:j])
        out[i:j] += (ratio_of_db(db) - 1) * band * signal.windows.tukey(j - i, .1)
    return out


def ring(x, modes, patchy_db=0):
    out = 0
    for k, (hz, db, t60) in enumerate(modes):
        pole = np.exp(2j * np.pi * hz / SR - np.log(1000) / (t60 * SR))
        fed = x * ratio_of_db(patchy_db * walk(16)) if patchy_db else x
        tone = signal.lfilter([0, pole.imag], [1, -2 * pole.real, abs(pole) ** 2], fed)
        out = out + (-1) ** k * ratio_of_db(db) * tone
    return out


def knocks():
    out, t = np.zeros(N), np.arange(int(.08 * SR)) / SR
    for s, db, hz in KNOCKS:
        fade = np.minimum(t * hz, 1) * np.exp(-np.log(1000) * t * hz / KNOCK_CYCLES)
        add(out, s, ratio_of_db(db + 7.5) * np.sin(2 * np.pi * hz * t) * fade)
    return out


def counter_thump(counter, rattle):
    sway = ratio_of_db(-65.0) * strokes(SWAYS)[0] * cut(rng.standard_normal(N), 58, "high")
    loose = colour(rattle * ratio_of_db(2.5 * walk(25)) * rng.standard_normal(N), RATTLE)
    return ring(ring(ratio_of_db(-38.0) * counter + sway, TOWEL), COUNTER) + loose


def ports(x):
    size = next_fast_len(N)
    hz = np.fft.rfftfreq(size, 1 / SR)
    side = rfft(x, size) * ratio_of_db(along(PORTS, hz))
    turn = along(TURN, hz)
    lean = irfft(side * np.cos(turn), size)[:N]
    lead = irfft(side * 1j * np.sin(turn), size)[:N]
    side = lean + lead * np.tanh(3.2 * walk(7.6) + 0.37)
    return np.array([x + side, x - side])


def kitchen(x, t60_s=0.51, early_db=-14, late_db=-17):
    t = np.arange(int(.9 * SR)) / SR
    early = np.exp(-t / 0.0037)
    late = np.exp(-np.log(1000) * t / t60_s) * np.minimum(t / 0.0021, 1)
    shape = ratio_of_db(early_db) * early / np.linalg.norm(early) + ratio_of_db(late_db) * late / np.linalg.norm(late)
    shared, own = rng.standard_normal(len(t)), rng.standard_normal((2, len(t)))
    own = own + cut(shared - own, 900, "low")
    echoes = [colour(shape * (0.21 * shared + 0.96 * o), KITCHEN) for o in own]
    return np.array([signal.oaconvolve(x, echo)[:N] for echo in echoes])


def fridge():
    t = np.arange(N) / SR
    hum = 0
    for hz, db in HUM:
        level = np.sqrt(2) * ratio_of_db(db + 1.0 * walk(7.2))
        hum = hum + level * np.sin(2 * np.pi * hz * t + 0.43 * walk(3.0))
    mid, side = (colour(rng.standard_normal(N), AIR, size=8192) for _ in range(2))
    return hum + ratio_of_db(AIR_DB) * np.array([mid + .5 * side, mid - .5 * side])


def along(table, hz):
    points = np.array(table)
    return np.interp(np.log(hz + 1), np.log(points[:, 0]), points[:, 1])


def colour(x, table, size=2048):
    cep = irfft(np.log(ratio_of_db(along(table, np.fft.rfftfreq(size, 1 / SR)))))
    cep[1:size // 2] *= 2
    cep[size // 2 + 1:] = 0
    h = irfft(np.exp(rfft(cep)))
    return signal.oaconvolve(x, h / np.sqrt(np.sum(h ** 2)))[:len(x)]


def cut(x, hz, kind):
    return signal.sosfilt(signal.butter(2, hz, kind, fs=SR, output="sos"), x)


def walk(rate):
    k = int(SR / rate)
    return 1.01 * uniform_filter1d(np.repeat(rng.standard_normal(N // k + 1), k), k)[:N]


def add(out, s, piece):
    i = max(int(s * SR), 0)
    out[i:i + len(piece)] += piece[:N - i]


def scene():
    air, thump = mortar()
    return ports(air + thump) + kitchen(air) + fridge()


def band_limit(x):
    return signal.sosfilt(signal.butter(12, 16980, fs=SR, output="sos"), x)


def record(dry):
    heard = cut(dry, 28, "high")
    rounded = 2 * np.tanh(heard / 2)
    mix = signal.sosfilt(signal.ellip(8, .2, 60, 16700, fs=SR, output="sos"), rounded)
    return band_limit(mix)


dry = scene()
out = record(dry)
master_out(out)
```